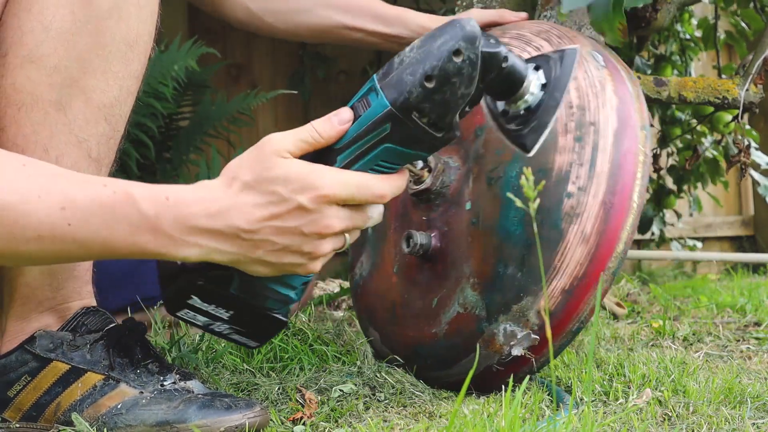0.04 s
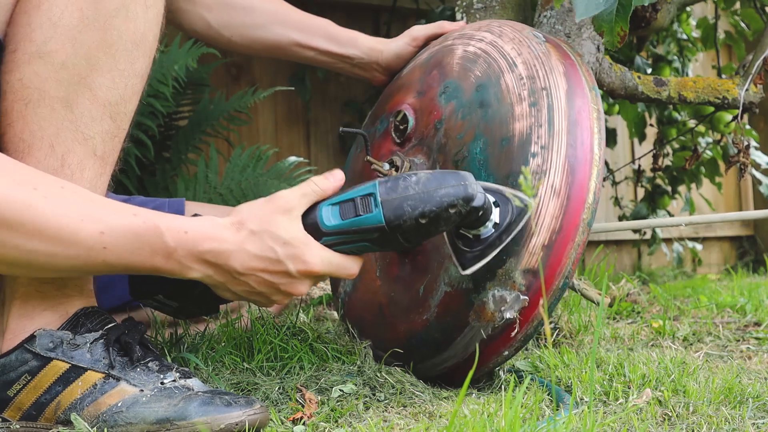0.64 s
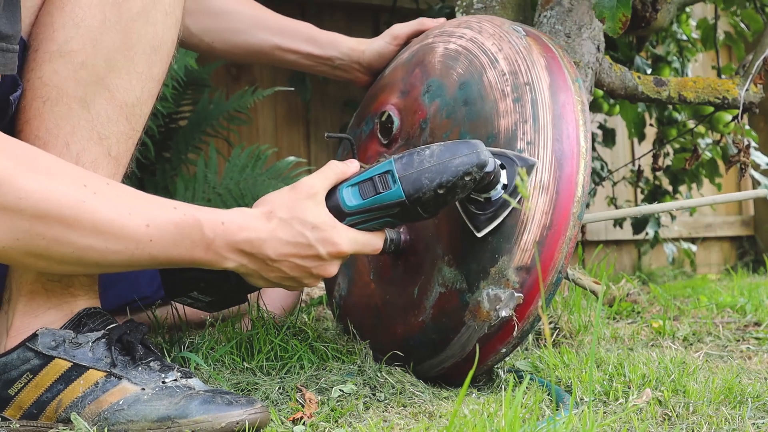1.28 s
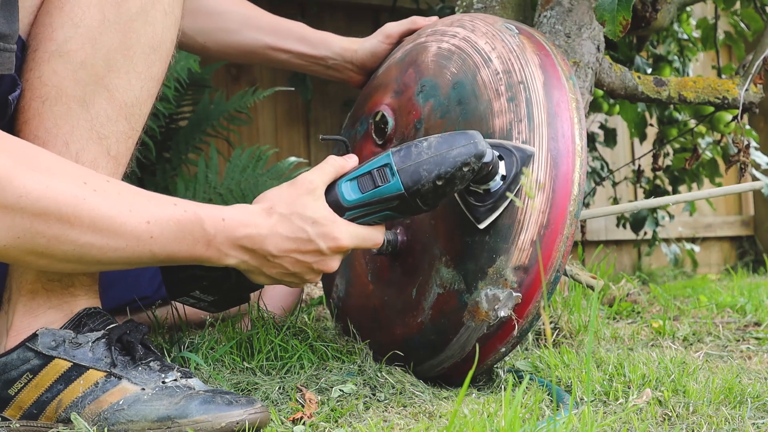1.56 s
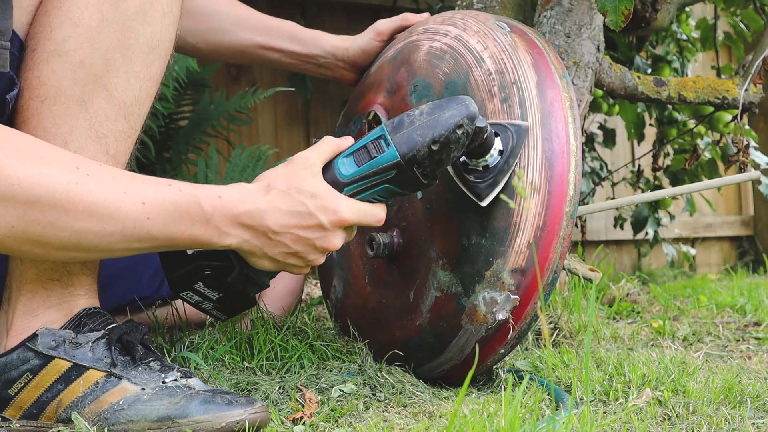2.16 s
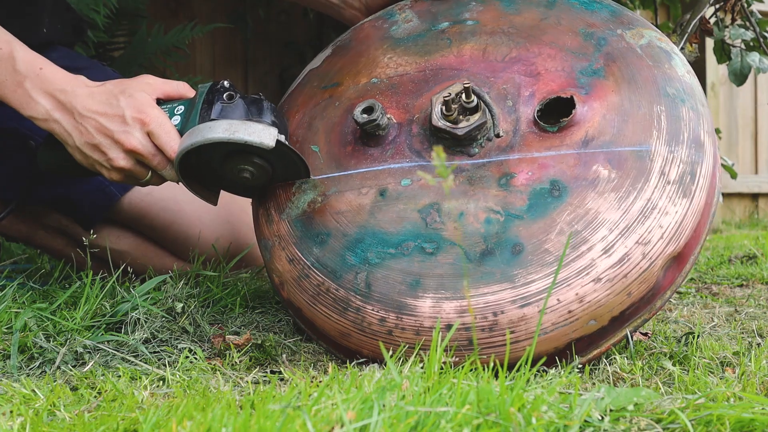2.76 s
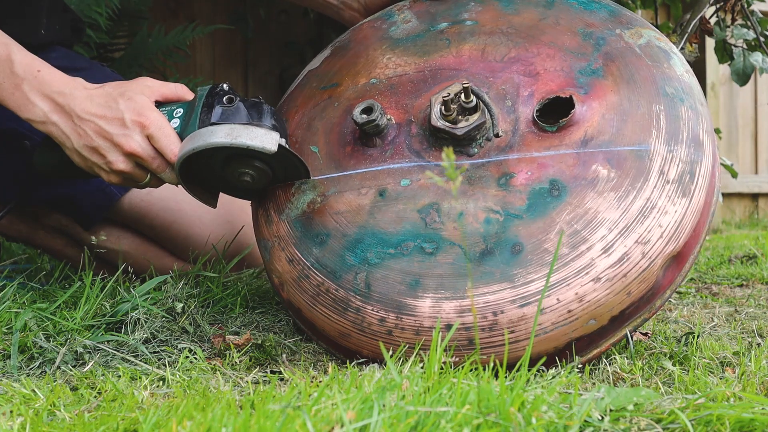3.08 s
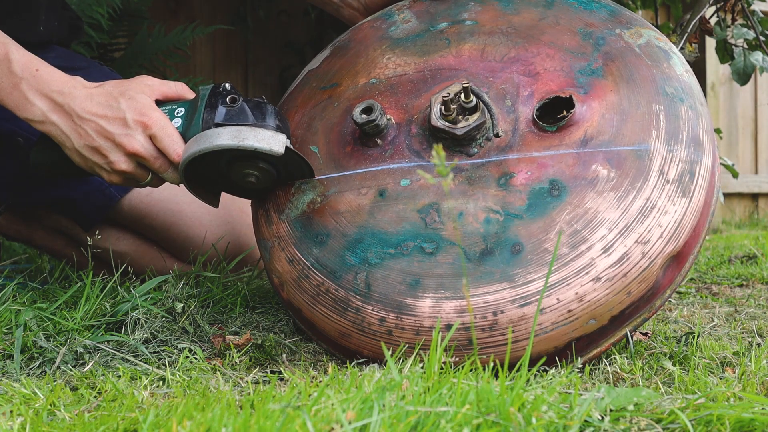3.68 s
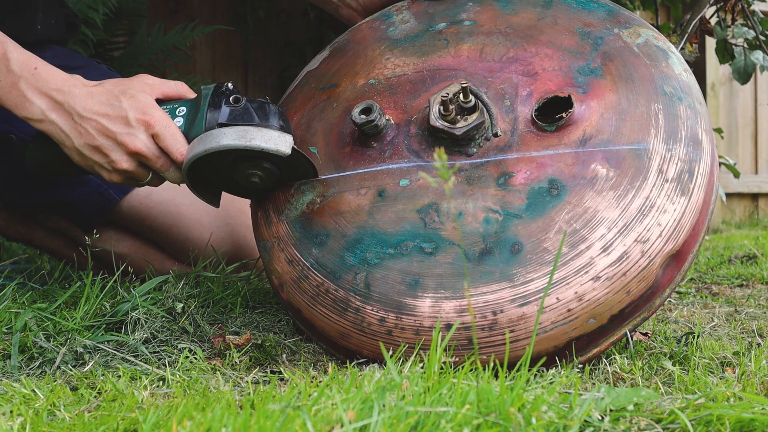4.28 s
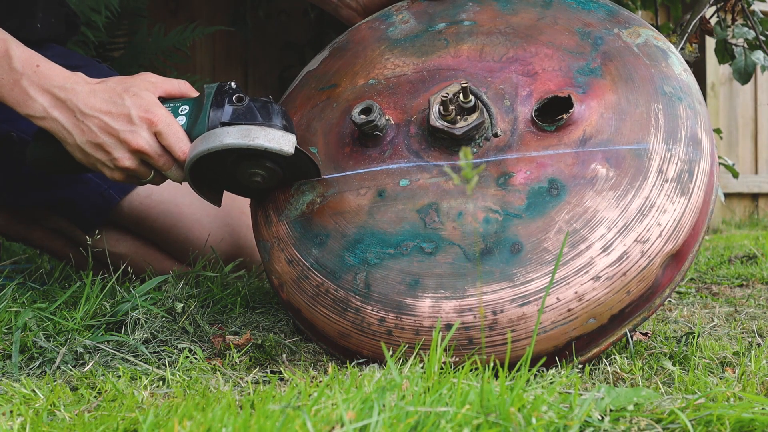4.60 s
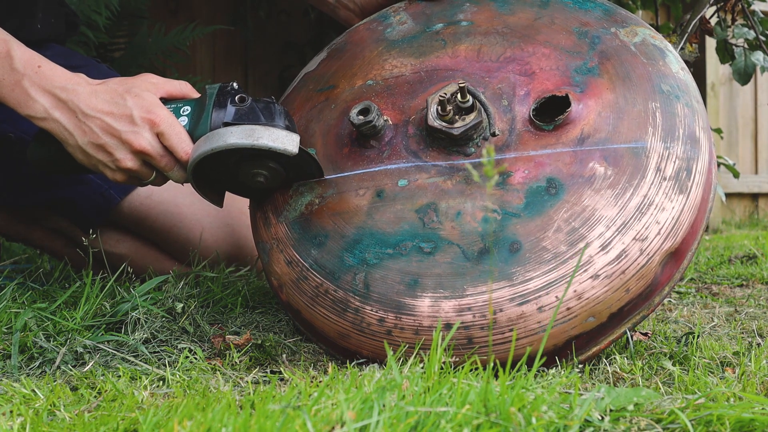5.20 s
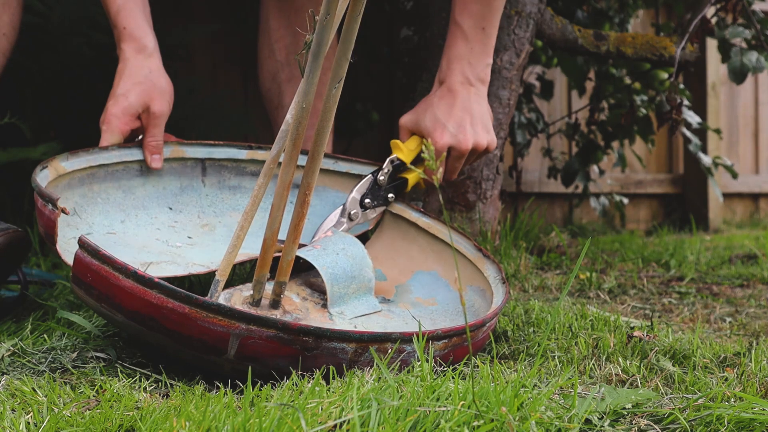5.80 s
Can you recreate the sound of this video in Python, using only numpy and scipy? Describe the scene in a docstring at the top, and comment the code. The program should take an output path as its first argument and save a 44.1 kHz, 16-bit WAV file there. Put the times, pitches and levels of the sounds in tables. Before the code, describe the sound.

An oscillating tool clicks on and buzzes against a metal tank, then an angle grinder rasps and screeches, and tin snips snap, outdoors.

```python
"""Cutting up a copper tank in a garden

Three scenes play one after another. First an oscillating multi-tool clicks on, runs up and buzzes as its
strokes strike the shell. The scene then changes abruptly to an angle grinder rasping at the rim and driving the
tank's modes into screeches; then it changes again to tin snips that knock on the pan, click and snap through
the sheet. A breeze bumps the microphone, and the garden hisses softly behind the multi-tool and the snips."""
import sys
import numpy as np
from scipy import signal
from scipy.fft import rfft, irfft, next_fast_len
from scipy.io import wavfile
from scipy.ndimage import uniform_filter1d, map_coordinates

SR = 44100
rng = np.random.default_rng(int(sys.argv[2]) if len(sys.argv) > 2 else 0)


def wav_out(sig):
    """Save sig, one row per channel (or a flat mono array), as 16-bit PCM at SR to the path in sys.argv[1]."""
    wavfile.write(sys.argv[1], SR, np.round(np.clip(np.atleast_2d(sig).T, -1, 1) * 32767).astype(np.int16))


N = 266805
TIME = np.arange(N) / SR
GRINDER_START_S, SNIPS_START_S = 2.387, 5.588

# effect of leaning on the multi-tool (harmonic number, gain [dB])
LEAN_GAINS = [(1, 4.5), (5, 3), (7, 6.5), (9, -4), (12, -5), (14, 4), (17, 3), (24, 5.5)]


def multi_tool():
    """Periodic impact: strokes on the shell chatter loosely, then buzz louder and cleaner with speed."""
    # run-up to a steady speed (time [s], stroke rate [Hz])
    stroke_rates = [(0.62, 47.2), (0.686, 63.7), (0.726, 74.0), (0.884, 116.5), (0.98, 147.3),
                    (1.042, 165.2), (1.2, 234.3), (1.27, 256.6), (1.41, 286.6), (1.45, 290.0),
                    (1.544, 291.9), (1.794, 289.4), (2.3, 289.6)]
    # spectra of the shell's chatter and of the scratching (frequency [Hz], level [dB])
    shell_spectrum = [(250, -50), (450, -37), (620, -11), (760, -2), (1050, -26), (1380, -8), (2150, -4.5),
                      (2950, -2), (3600, -10), (4300, -7.5), (6000, -16), (7500, -20), (10000, -45),
                      (15000, -120)]
    scratch_spectrum = [(3240, -2.5), (5500, -2), (5700, -1), (5770, 1), (6280, -4), (6650, -7), (7830, 3),
                        (8710, 0), (10900, -6.5), (12000, 2), (13700, -15), (15100, -9), (15800, -16)]
    # modes of the tool's steel plate (frequency [Hz], width [Hz], level [dB])
    plate_modes = [(2950, 400, -10), (3650, 480, 9)]
    # the plate skids and rings out (time [s], half-length [s], gain [dB])
    skids = [(1.41, 0.033, 6), (1.593, 0.012, 11.5)]
    full_speed_hz = 289.6
    speed, = curves(stroke_rates)
    turns = np.cumsum(speed) / SR
    pace = speed / full_speed_hz
    slack = np.abs(1 - pace) ** 3
    settled = ramp([1.32, 1.63])  # the plate comes to lie flat, which quietens it
    lean = ramp([2.016, 2.28])  # the hand presses harder
    chatter_share = np.clip(1 - 0.69 * pace ** 1.1, 0, 1)
    buzz = shell_buzz(speed, turns, settled, lean)
    apart_db = 14 * (1 - pace)  # slow strokes stand apart as taps; fast ones run together
    blows = contact(turns, apart_db - 3, scatter_db=-0.5)
    blows *= rubbing(turns, memory=4.7, loose=0.56, size=140)
    shell = np.sqrt(1 - chatter_share) * buzz + np.sqrt(chatter_share) * coloured(blows, shell_spectrum)
    plate = resonant(resonant(blows, plate_modes), plate_modes)
    friction = contact(turns, apart_db - 0.5, scatter_db=1)
    friction *= rubbing(turns, memory=21, loose=0.39 + 0.5 * (1 - pace), size=140)
    scratch = coloured(friction, scratch_spectrum)
    hum = np.sqrt(2) * np.sin(2 * np.pi * turns) * pace ** 3
    skid_db = sum(db * swell(s, half) for s, half, db in skids)
    sound = (amp(-47.5 + LEAN_GAINS[0][1] * lean) * hum
             + amp(-27 - 45.5 * slack - 3 * settled) * shell
             + amp(-35.5 - 35 * slack - 6.5 * settled - 2 * lean + skid_db) * plate
             + amp(-34 - 43 * slack) * scratch)
    return sound * ramp([0.6, 0.75]) * gate(0, GRINDER_START_S)


def shell_buzz(speed, turns, settled, lean):
    """Forced vibration: stroke harmonics sweep through the shell's peaks, then settle; grip sways them."""
    # stroke spectra, running up and at full speed (harmonic number, level [dB])
    run_up_harmonics = [(1, -12), (2, -17), (3, -10), (4, -3), (5, -13), (6, -2), (7, -2), (8, -5), (9, 3),
                        (10, -2), (11, -6), (12, 0.5), (13, -0.5), (14, -3), (15, -8), (16, -18),
                        (17, -4.5), (18, -12), (19, -12), (20, -12)]
    steady_harmonics = [(1, -7), (2, -31), (3, -16), (4, -0.5), (5, 7.5), (6, 3), (7, 1), (8, 4.5),
                        (9, -21.5), (10, 3), (11, 1.5), (12, 5.5), (13, -5), (14, -2.5), (15, -9), (16, -4),
                        (17, 5), (18, -4), (19, 1), (20, -30), (21, -6), (22, -10), (23, -22), (24, -9)]
    # resonance peaks of the shell (frequency [Hz], gain [dB])
    shell_response = [(450, -15), (610, -16), (700, -3), (820, -12), (1050, -8), (1220, -6), (1340, 9.5),
                      (1480, 0), (1650, 1.5), (1850, -3), (2100, 6), (2600, -7), (3100, -1), (3400, -8),
                      (3780, 5.5), (4600, -5)]
    buzz, power = 0, 0
    for k, steady_db in steady_harmonics[1:]:
        resonance_db = np.interp(k * speed, *np.transpose(shell_response))
        rising_db = np.interp(k, *np.transpose(run_up_harmonics)) + resonance_db + 2 * wobble(25.2)
        size = amp((1 - settled) * rising_db + settled * steady_db + 2 * wobble(6.98))
        leaning = amp(lean * np.interp(k, *np.transpose(LEAN_GAINS)))
        phase = 2 * np.pi * (k * turns + rng.random()) + 0.012 * k * wobble(60)
        buzz += leaning * size * np.sin(phase)
        power += size ** 2 / 2
    return buzz / np.sqrt(power)


def grinder():
    """Modulated abrasion: the disc runs slightly out of true and bites the rim once a turn."""
    # speed of the disc (time [s], rotation rate [Hz])
    disc_rates = [(2.42, 114.8), (2.48, 114.7), (2.6, 118.9), (2.67, 122.2), (2.78, 122.2), (2.85, 125.4),
                  (2.93, 127.6), (3.2, 129.8), (3.34, 129.3), (3.74, 124.7), (4.0, 126.0), (4.74, 122.8),
                  (5.21, 125.6), (5.38, 125.8), (5.58, 124.0)]
    # spectra of the rim's rasp and the grit's hiss (frequency [Hz], level [dB])
    rim_spectrum = [(590, -64), (1000, -32), (1050, -74), (1080, -39), (1200, -41), (1340, -12),
                    (1470, -22), (1620, -6.5), (2430, 4), (2750, 1), (3040, 4.5), (3870, 2.5), (5000, -8),
                    (6500, -30), (11000, -120)]
    grit_spectrum = [(2710, -20), (4600, -9.5), (5040, -11.5), (5440, 0.5), (5730, 1.5), (6510, -1.5),
                     (7100, -3.5), (9410, -3.5), (10300, -7.5), (11000, -1), (12000, -3.5), (13000, -2.5),
                     (15600, -5.5)]
    # the disc snags on the rim (time [s], half-length [s], rasp gain [dB])
    snags = [(2.59, 0.024, 2), (2.698, .025, 4.5)]
    speed, = curves(disc_rates)
    turns = np.cumsum(speed) / SR
    cutting_s = TIME - GRINDER_START_S
    screech_db, focus_hz = disc_binding()
    snag_db = sum(db * swell(s, half) for s, half, db in snags)
    deep = ramp([4.5, 5.5])  # deep in its groove the disc bites harder and repeats more exactly
    cut = contact(turns, 1.5 + 3.4 * deep, scatter_db=1.5)
    cut *= rubbing(turns, memory=35, loose=0.53 - 0.064 * deep, size=320)
    # rasp and hiss fade as the groove deepens
    rasp_db = -34.5 - 1.2 * cutting_s + 0.06 * screech_db + snag_db + 0.75 * wobble(12)
    hiss_db = -33 - 0.42 * cutting_s + 0.086 * screech_db + 0.8 * wobble(12)
    rasp = amp(rasp_db) * coloured(cut, rim_spectrum)
    hiss = amp(hiss_db) * coloured(cut, grit_spectrum)
    ring = tank_ring(speed, turns, cutting_s, screech_db, focus_hz)
    ring *= contact(turns, 1 + 4 * deep, scatter_db=0.5)
    return (rasp + ring + hiss + grinder_motor(turns)) * gate(GRINDER_START_S, SNIPS_START_S)


def disc_binding():
    """Friction squeal: the gain [dB] and focus [Hz] of the tank's screech while the disc binds."""
    # spells of binding (start [s], end [s], gain [dB], focus [Hz])
    spells = [(2.4, 3.0, 15, 3270), (2.982, 3.52, 17, 3600), (4.802, 5.2, 12.5, 2680),
              (5.2, 5.65, 13.5, 3600)]
    onset_s = 0.087
    fade = np.array([-0.5, 0.5]) * onset_s
    screech_db = sum(db * (ramp(start + fade) - ramp(end + fade)) for start, end, db, _ in spells)
    focus_hz, = curves([(s, hz) for start, end, _, hz in spells for s in (start + fade[1], end + fade[0])])
    return screech_db, focus_hz


def tank_ring(speed, turns, cutting_s, screech_db, focus_hz):
    """Modal response: a screech lifts the wall modes near its focus and weakens those of the dome."""
    # modes of the wall, the broadest panel and the cut edge (frequency [Hz], width [Hz], level [dB])
    wall_modes = [(2320, 25, -11), (2510, 21, -14), (3030, 230, -2.5), (3218, 62, -3), (3390, 65, -5),
                  (3650, 42, -9), (3755, 96, -1.5), (3867, 60, -4), (3950, 83, -7)]
    dome_modes = [(1105, 13, -11.5), (1615, 27, -2.5), (1773, 17, 0.5), (1848, 14, -1.5), (1990, 23, -2.5)]
    edge_modes = [(5540, 70, -9), (6550, 64, 1.5), (7990, 130, -1), (8300, 55, -1), (11100, 160, -13),
                  (12950, 160, -4)]
    loss_db_per_octave = 15
    focused_modes = [(hz, width, db - loss_db_per_octave * np.abs(np.log2(hz / focus_hz)))
                     for hz, width, db in wall_modes]
    dome = amp(-43 - 0.27 * screech_db) * ringing(dome_modes, speed, turns)
    wall = amp(-50 + screech_db) * ringing(focused_modes, speed, turns)
    edge = amp(-53 + 3 * cutting_s) * ringing(edge_modes, speed, turns)  # grows as the slot lengthens
    return dome + wall + edge


def ringing(modes, speed, turns):
    """Resonance: a mode sings whenever a harmonic of the disc's rotation drifts through it."""
    ring = 0
    for hz, width, db in modes:
        sway = amp(db + 1.6 * wobble(16))
        slip = 0.36 * wobble(50)
        nearest = round(hz / np.median(speed))
        for k in (nearest - 1, nearest):
            detuning = 2 * (k * speed - hz) / width
            ring += sway / (1 + detuning ** 2) * np.sin(2 * np.pi * (k * turns + rng.random()) + slip)
    return ring


def grinder_motor(turns):
    """Rotating machinery: gear tones locked to the disc's turn sound over the rush of the cooling fan."""
    # fan noise (frequency [Hz], level [dB])
    fan_spectrum = [(120, -54), (200, -20), (252, -7), (338, -9), (375, -3), (408, 9), (439, -6),
                    (470, 2.5), (540, 1), (660, 8), (850, -1), (1200, -5.5), (1560, -35), (2640, -120)]
    # tones of the disc and gears (multiple of the rotation rate, level [dB])
    gear_orders = [(1, -23), (2, -15.5), (3, -4), (3.6, -2), (4, -10), (6, -7), (8, -12.5), (9, -22),
                   (11, -6.5)]
    fan = coloured(rubbing(turns, memory=6.9, loose=0.63, size=320), fan_spectrum)
    gears = sum(amp(db + 0.67 * wobble(3.97)) * np.sin(2 * np.pi * k * turns) for k, db in gear_orders)
    return amp(-60.5 + 5 * ramp([2.93, 3.25])) * (fan + gears)


def snips():
    """Impact and free decay: blades click, jaws snap, and the jolted pan thuds, damped by the grass."""
    # jolts (time [s], blade click [dB], jaw snap [dB], pan knock [dB])
    jolts = [(5.7253, -77, -62, -34), (5.751, -59, -58, -46), (5.789, -36.5, -56, -65),
             (5.793, -39, -56, -46), (5.849, -57, -70, -72), (5.8783, -47, -60, -42),
             (5.916, -44, -23, -34), (5.931, -55, -43, -43)]
    # spectra of the blades, the jaws and the pan's dull body (frequency [Hz], level [dB])
    blade_spectrum = [(1470, -34), (2500, -10), (3340, -24), (3640, 3), (3960, -15), (7250, -2), (7890, -9),
                      (15600, -12)]
    jaw_spectrum = [(180, -37), (300, -7), (769, -7), (1380, -16), (1970, 2.5), (3130, -13), (3550, -5),
                    (3830, 9.5), (4610, -20), (5720, -15), (6180, -26), (7670, -31), (12000, -35),
                    (15600, -61), (22000, -120)]
    thud_spectrum = [(180, -36), (300, -6), (985, 1), (1300, -20), (1470, -22), (1820, -16), (1970, -32),
                     (2500, -34), (3250, -64), (5500, -120)]
    # modes of the pan (frequency [Hz], level [dB], t60 [s])
    pan_modes = [(458, -6, 0.23), (730, -6, 0.075), (1000, 0, 0.018), (1210, -6, 0.016), (1540, -14, 0.38),
                 (3850, -12, .05)]
    thud_db, ring_db = -6.5, -3  # relative to the knock
    blade, jaw, thud, pan = np.zeros((4, N))
    for s, blade_db, jaw_db, knock_db in jolts:
        blade += amp(blade_db) * (dying(s, t60=0.014) + amp(-18) * dying(s, t60=0.11))
        jaw += amp(jaw_db) * (dying(s, t60=0.012) + amp(-21) * dying(s, t60=0.09))
        thud += amp(knock_db + thud_db) * dying(s, t60=0.12)
        t = TIME[:N - round(s * SR)]
        for hz, db, t60 in pan_modes:
            strength = amp(knock_db + ring_db + db + rng.standard_normal())
            pan[-len(t):] += strength * np.exp(-np.log(1000) * t / t60) * np.sin(2 * np.pi * hz * t)
    blade += amp(-64.5 + 2.3 * wobble(180)) * gate(5.75, 5.93)  # shearing through the sheet
    return blade * noise(blade_spectrum) + jaw * noise(jaw_spectrum) + thud * noise(thud_spectrum) + pan


def switch_on():
    """Impact and electrical hum: the multi-tool's switch snaps over and its stalled motor whines."""
    # slide, catch and rattle (time [s], level [dB], t60 [s])
    clicks = [(0.388, -40, .04), (0.3976, -23.5, 0.022), (0.404, -47, 0.11)]
    # spectrum of the switch (frequency [Hz], level [dB])
    switch_spectrum = [(880, -62), (1500, -32), (2860, -2), (3690, 3.5), (4240, 0), (4810, 4.5),
                       (7410, -24), (10600, -12), (13300, -20), (15600, -33)]
    # tones of the motor's chopped supply (frequency [Hz], level [dB])
    supply_tones = [(1502, -62.5), (2003, -59.5), (2503, -63), (3004, -67), (5012, -66)]
    click = sum(amp(db) * dying(s, t60) for s, db, t60 in clicks) * noise(switch_spectrum)
    whine = sum(amp(db) * np.sqrt(2) * np.sin(2 * np.pi * hz * TIME) for hz, db in supply_tones)
    return click + whine * np.interp(TIME, [0.44, 0.5, 0.7, 0.9], [0, 1, 1, 0])


def outdoors():
    """Turbulence: breeze and gusts rumble and flutter on the microphone over the garden's soft hiss."""
    # spells of breeze (start [s], end [s], rumble [dB], flutter [dB], rumble decay [dB/s])
    breezes = [(0, 2.387, -41, -49, 11.5), (2.387, 6.2, -76, -79, 2), (5.588, 6.1, -59, -53, 0)]
    # gusts (time [s], half-length [s], rumble [dB], flutter [dB])
    gusts = [(0.066, 0.035, -38, -55), (0.222, 0.033, -25.5, -39), (0.293, 0.03, -28.5, -34.5),
             (0.51, 0.22, -38.5, -48), (0.726, 0.049, -30.5, -44), (1.184, 0.044, -31, -44),
             (1.39, 0.017, -39, -58), (1.604, 0.049, -40, -60), (3.453, 0.022, -50, -55),
             (3.55, 0.4, -61.5, -71), (4.71, .03, -59, -68)]
    # spectra of the wind and of the garden air, early and late (frequency [Hz], level [dB])
    rumble_spectrum = [(10, -35), (22, -3), (38, 4), (70, -1), (110, -14.5), (220, -42), (500, -120)]
    flutter_spectrum = [(50, -10), (90, -2), (150, -2.5), (220, -5.5), (320, -19.5), (700, -33.5),
                        (1500, -120)]
    early_spectrum = [(150, -19), (300, -5.5), (450, -12), (800, -14), (1500, -12), (2600, -16),
                      (3800, -12), (5000, -20), (7000, -28.5), (10000, -36.5), (15800, -44)]
    late_spectrum = [(100, -27), (170, -13.5), (399, -17.5), (561, -20), (692, -27), (732, -24), (868, -20),
                     (1480, -23.5), (1590, -24), (1820, -24), (2160, -26.5), (4350, -24), (5670, -36.5),
                     (15800, -55)]
    rumble, flutter = np.zeros((2, N))
    for start, end, rumble_db, flutter_db, decay in breezes:
        flow = gate(start, end) * amp(2.9 * wobble(8))
        lull_db = decay * (TIME - start)
        rumble += amp(rumble_db - lull_db) * flow
        flutter += amp(flutter_db - 0.34 * lull_db) * flow
    for s, half, rumble_db, flutter_db in gusts:
        rumble = np.hypot(rumble, amp(rumble_db) * swell(s, half))
        flutter = np.hypot(flutter, amp(flutter_db) * swell(s, half))
    early_air = amp(-51.5) * noise(early_spectrum) * gate(0, GRINDER_START_S)
    late_air = amp(-49.5) * noise(late_spectrum) * gate(SNIPS_START_S, np.inf)
    return rumble * noise(rumble_spectrum) + flutter * noise(flutter_spectrum) + early_air + late_air


def contact(turns, bite_db, scatter_db):
    """Contact force: one pulse a cycle, each of its own strength."""
    strength = rng.standard_normal(N)[turns.astype(int)]
    return unit(amp((bite_db + scatter_db * strength) * np.sin(np.pi * turns) ** 4))


def rubbing(turns, memory, loose, size):
    """Cyclic friction: an edge of size bumps wears over memory cycles; a loose share never repeats."""
    retention = np.exp(-1 / memory)
    roughness = rng.standard_normal((int(turns[-1]) + 2, size))
    edge = signal.lfilter([1], [1, -retention], roughness, axis=0)
    repeating = unit(map_coordinates(edge.ravel(), [turns * size]))
    loose = np.clip(loose, 0, 1)
    return np.sqrt(1 - loose) * repeating + np.sqrt(loose) * rng.standard_normal(N)


def resonant(x, modes):
    """Parallel resonators (frequency [Hz], width [Hz], level [dB]) driven by x, at rms 1."""
    def response(f):
        return sum(amp(db) * 1j * f * width / (hz * hz - f * f + 1j * f * width) for hz, width, db in modes)
    return unit(filtered(x, response))


def filtered(x, response):
    """Linear filtering: the spectrum of x times a frequency response."""
    size = next_fast_len(N + SR // 4)
    return irfft(rfft(x, size) * response(np.fft.rfftfreq(size, 1 / SR)), size)[:N]


def coloured(x, spectrum):
    """Spectral shaping of x by (frequency [Hz], level [dB]) points, at rms 1."""
    f, db = np.transpose(spectrum)
    return unit(filtered(x, lambda hz: amp(np.interp(np.log(hz + 1), np.log(f + 1), db))))


def noise(spectrum):
    """Coloured noise of rms 1."""
    return coloured(rng.standard_normal(N), spectrum)


def amp(db):
    """Decibels to gain."""
    return 10 ** (np.asarray(db) / 20)


def unit(x):
    """Scale to rms 1."""
    return x / np.sqrt(np.mean(x ** 2) + 1e-20)


def curves(rows):
    """Linear interpolation of each column after the time."""
    times, *columns = np.transpose(rows)
    return [np.interp(TIME, times, column) for column in columns]


def wobble(rate):
    """A smooth random curve, rate knots a second."""
    return map_coordinates(rng.standard_normal(int(N * rate / SR) + 4), [TIME * rate], order=2)


def gate(start, end):
    """1 from start to end [s], 0 outside, with smoothed edges."""
    return uniform_filter1d(1. * ((TIME >= start) & (TIME < end)), size=64)


def dying(s, t60):
    """Exponential decay from time s, falling 60 dB in t60."""
    return (TIME >= s) * np.exp(-np.log(1000) * np.maximum(TIME - s, 0) / t60)


def swell(s, half):
    """A Gaussian bell of height 1 around time s."""
    return np.exp(-((TIME - s) / half) ** 2)


def ramp(span):
    """0 before the span [s], 1 after it."""
    return np.interp(TIME, span, [0, 1])


def scene():
    """Superposition: all the sources add at one microphone."""
    return (switch_on() + multi_tool() + grinder() + snips() + outdoors())[None]


def record(dry):
    """Band limiting: an ideal low-pass removes the highest treble."""
    cutoff_hz = 15760
    return filtered(dry[0], lambda hz: hz < cutoff_hz)[None]


dry = scene()
out = record(dry)
wav_out(out)
```